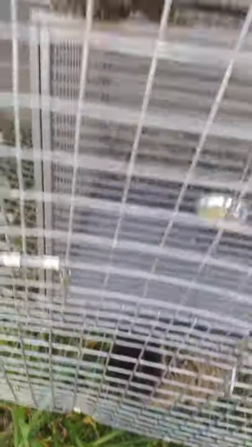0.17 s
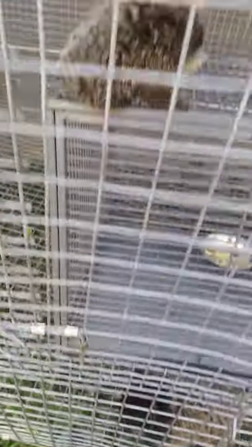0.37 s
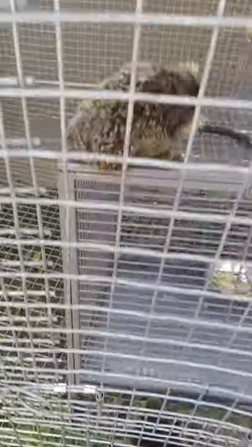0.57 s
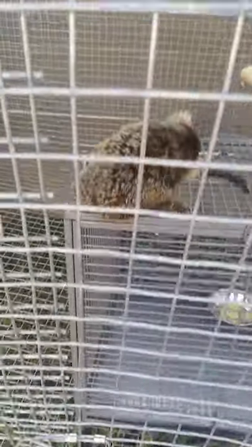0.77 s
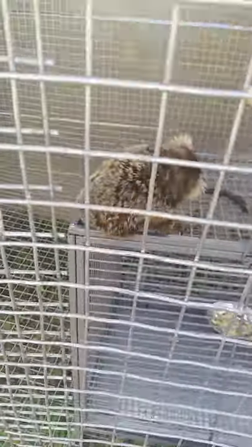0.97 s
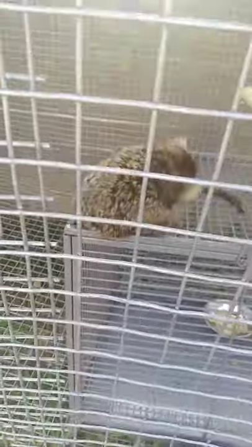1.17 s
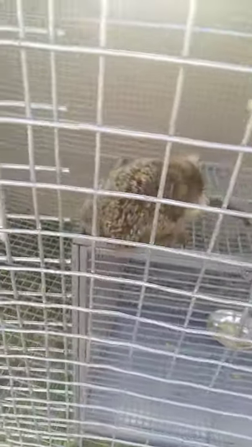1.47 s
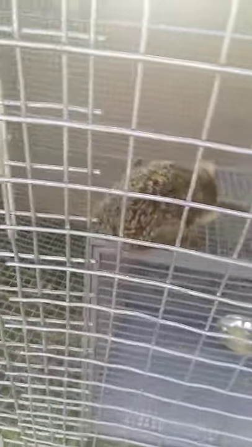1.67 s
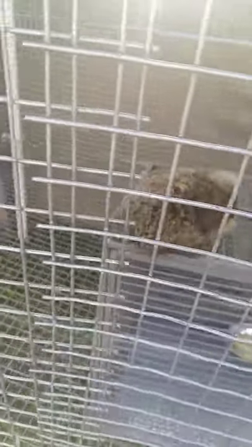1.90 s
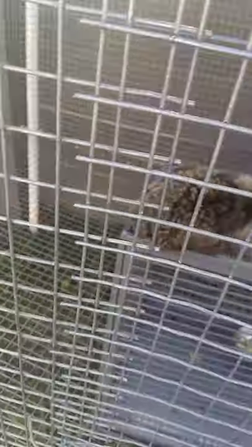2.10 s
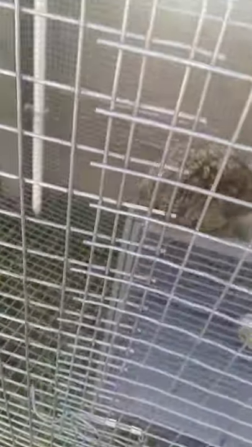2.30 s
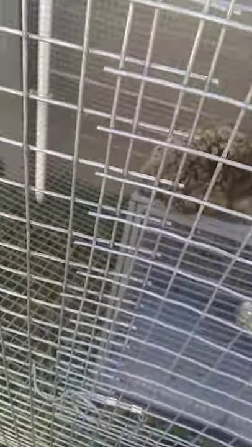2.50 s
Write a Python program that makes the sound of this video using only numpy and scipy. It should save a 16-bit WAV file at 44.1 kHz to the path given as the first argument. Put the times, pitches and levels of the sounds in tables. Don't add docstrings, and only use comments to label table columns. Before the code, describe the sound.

One harsh, raspy bark from a small caged animal comes near the end, after wind rumble and thumps, faint distant twitters, hollow drips and light ticks on wire, outdoors on a handheld microphone.

```python
import sys
import numpy as np
from scipy import signal
from scipy.io import wavfile
from scipy.ndimage import uniform_filter1d

SR = 44100
rng = np.random.default_rng(int(sys.argv[2]) if len(sys.argv) > 2 else 0)


def materialize(psi):
    bounded = np.clip(np.atleast_2d(psi).T, -1, 1)
    quanta = np.round(bounded * 32767).astype(np.int16)
    wavfile.write(sys.argv[1], SR, quanta)


def volts_from_decibels(level):
    exponent = np.asarray(level, float) / 20
    return 10 ** exponent


N = 116865


def evened(x):
    return x / np.sqrt(np.mean(x ** 2) + 1e-20)


def add(mix, start_s, sound):
    part = mix[max(round(start_s * SR), 0):][:len(sound)]
    part += sound[:len(part)]


def curve(t, points):
    return np.interp(t, *np.transpose(points))


def resonate(x, hz, width):
    turn = np.exp(2j * np.pi * np.cumsum(hz * np.ones(len(x))) / SR)
    r = np.exp(-np.pi * width / SR)
    return 2 * (turn * signal.lfilter([(1 - r) ** 2], [1, -2 * r, r * r], x / turn)).real


def breeze(shape, db, patchy_db, gust_db):
    frames, hz = N // 512 + 5, np.fft.rfftfreq(2048, 1 / SR)
    a, b, patches = rng.standard_normal((frames, 1025, 3)).T
    patches = uniform_filter1d(patches, size=8, axis=0)
    patches = evened(uniform_filter1d(patches, size=5, axis=1))
    gusts = evened(uniform_filter1d(rng.standard_normal(frames), size=4))
    f, level = np.transpose(shape)
    colour = np.interp(np.log(hz + 1), np.log(f + 1), level, left=-60, right=-60)
    z = (a + 1j * b) * volts_from_decibels(colour[:, None] + patchy_db * patches + gust_db * gusts)
    noise = signal.istft(z, nperseg=2048, noverlap=1536)[1][:N]
    return volts_from_decibels(db) * evened(noise)


# pitch in Hz, level in dB per Hz.
AIR_COLOUR = [(210, -28), (350, -6.5), (514, -3.5), (843, 0.5), (1160, -6.5), (1820, -13.5), (10100, -20.5),
              (15000, -20.5), (16000, -14)]


def air():
    return breeze(AIR_COLOUR, -72.79, patchy_db=0.36, gust_db=1.03)


# pitch in Hz, width of its waver in Hz, level in dB.
HUM_TONES = [(120.03, 11.9, -52.5), (241.8, 4.9, -68.5), (59.6, 12, -57.5)]


def hum():
    t = np.arange(N) / SR
    out = np.zeros(N)
    for hz, width, db in HUM_TONES:
        clean = np.sin(2 * np.pi * (hz * t + rng.random()))
        waver = evened(resonate(rng.standard_normal(N), hz, width))
        out += volts_from_decibels(db) * (1.25 * clean + 0.41 * waver)
    return out


# start in seconds, level in dB, pitch in Hz.
BUFFET_EVENTS = [
    (.835, -48, 115),
    (.96, -40.5, 114.5),
    (1.595, -41, 129),
    (2.292, -41.5, 102),
    (2.298, -55, 265),
    (0.829, -64, 278),
]


def buffets():
    turns = 0.94
    out = np.zeros(N)
    for start_s, db, hz in BUFFET_EVENTS:
        u = np.arange(SR // 10) / SR * hz / turns
        add(out, start_s, volts_from_decibels(db) * u * np.exp(1 - u) * np.sin(2 * np.pi * turns * u))
    return out


# pitch in Hz, level in dB per Hz.
RUMBLE_COLOUR = [(20, -22.5), (40, -13), (56, 0.5), (124, 0.5), (172, -9.5), (255, -15), (285, -31),
                 (370, -34), (400, -49), (550, -68)]
# time in seconds, change in dB.
GUST_CURVE = [(0, 2), (.4, 2.5), (.55, -2.5), (.78, -3), (.9, 0), (1.2, -0.5), (1.42, 1.5), (1.569, -6),
              (1.75, 2), (2.1, 1.5), (2.242, 1), (2.301, 4.5), (2.36, -3.5), (2.47, -3), (2.65, 0)]
# middle in seconds, depth in dB, half width in seconds.
WIND_LULLS = [(.37, -2, 0.023), (.6, -6.5, 0.0083), (0.743, -16, 0.0066), (0.785, -15, 0.0075),
              (0.916, -7, 0.01), (1.056, -4.5, 0.016), (1.331, -10, 0.0066), (1.531, -11, 0.0066),
              (1.569, -9.5, 0.015), (1.733, -6, 0.019), (2.107, -3.5, .01), (2.265, -10, .02),
              (2.553, -25, 0.0059)]


def wind():
    even_s, even_share, gust_hz = 0.068, 0.78, 129.5
    t = np.arange(N) / SR
    rumble = breeze(RUMBLE_COLOUR, -46.5, patchy_db=-0.7, gust_db=1.5) + hum()
    power = uniform_filter1d(rumble ** 2, round(even_s * SR))
    power = uniform_filter1d(power, round(even_s * SR))
    rumble = rumble * (power.mean() / power) ** (even_share / 2)
    low = signal.sosfiltfilt(signal.butter(3, gust_hz, fs=SR, output="sos"), rumble)
    out = low + volts_from_decibels(curve(t, GUST_CURVE)) * (rumble - low)
    lull_db = sum(db * np.exp(-((t - s) / half_s) ** 2) for s, db, half_s in WIND_LULLS)
    return out * volts_from_decibels(lull_db) * np.minimum(t / .006, 1) + buffets()


def yard(x, wet_db):
    t60_s = 0.21
    t = np.arange(SR // 4) / SR
    tail = rng.standard_normal(len(t)) * volts_from_decibels(-60 * t / t60_s) * (t > .008)
    return x + volts_from_decibels(wet_db) * signal.fftconvolve(x, tail / np.linalg.norm(tail))[:N]


# time in seconds, peak level in dB, pitch in Hz, length in seconds.
DRIP_EVENTS = [(0.093, -56, 739, 0.032), (0.116, -57.5, 741, 0.039), (0.15, -56, 832, 0.021),
               (0.212, -61.5, 587, 0.019), (.21, -64, 715, 0.028), (0.428, -55, 674, 0.03),
               (0.449, -50.5, 690, 0.029), (0.527, -60.5, 720, 0.019), (0.577, -55, 693, 0.027),
               (0.612, -60, 700, 0.019), (0.792, -47.5, 764, 0.019), (0.835, -69, 695, 0.037),
               (0.912, -58, 875, 0.017), (1.078, -55.5, 647, 0.061), (1.129, -65, 597, 0.028),
               (1.2, -55, 775, 0.019), (1.541, -55.5, 868, 0.017), (1.726, -62.5, 803, 0.023),
               (1.754, -54.5, 870, 0.017), (1.863, -63.5, 627, 0.038), (1.961, -60, 912, 0.02),
               (2.005, -70, 797, 0.018), (2.082, -61.5, 877, 0.024), (2.13, -51, 906, 0.02),
               (2.562, -63.5, 969, 0.041)]


def drips():
    level_db, rise = -3.5, 0.091
    out = np.zeros(N)
    for s, db, hz, length_s in DRIP_EVENTS:
        u = np.arange(0, 1, 1 / (length_s * SR))
        tone = np.sin(2 * np.pi * hz * length_s * (u + rise * (u * u - u)))
        add(out, s - .006, volts_from_decibels(db + level_db) * np.sin(np.pi * u) ** 2.27 * tone)
    return out


def strand(length_s, hz, width, db, clean):
    u = np.arange(0, 1, 1 / (length_s * SR))
    fuzz = evened(resonate(rng.standard_normal(SR // 2), hz, width))[-len(u):]
    tone = clean * np.sqrt(2) * np.sin(2 * np.pi * hz * length_s * u) + (1 - clean) * fuzz
    swell = np.clip(np.minimum(u / .3, (1 - u) / .65), 0, 1)
    return volts_from_decibels(db) * np.sin(np.pi / 2 * swell) * tone


# start in seconds, length in seconds, pitch in Hz, level in dB.
SQUEAK_EVENTS = [(0.001, 0.024, 5760, -76), (0.272, 0.0099, 12200, -71), (0.344, 0.019, 2670, -72),
                 (0.363, 0.024, 2670, -69), (0.489, 0.086, 1301, -73.5), (1.238, .014, 4130, -75),
                 (1.51, 0.011, 4070, -71), (1.594, 0.1, 7800, -70.5), (1.704, 0.048, 7750, -82),
                 (1.76, 0.036, 4390, -75), (1.809, 0.019, 7230, -73), (2.172, 0.014, 3090, -77),
                 (2.328, 0.02, 4650, -75), (2.508, 0.09, 3610, -72), (2.57, 0.016, 4680, -72),
                 (2.465, .008, 4700, -57.5), (1.026, 0.013, 4680, -66)]


def squeaks():
    out = np.zeros(N)
    for start_s, length_s, hz, db in SQUEAK_EVENTS:
        add(out, start_s, strand(length_s, hz, 60, db, clean=0.69))
    return out


# start in seconds, length in seconds, pitch in Hz,
# width of its waver in Hz, level in dB.
TWITTER_STRANDS = [(.365, 0.22, 7060, 200, -69), (.47, .26, 7020, 200, -72), (.41, .2, 6330, 170, -70),
                   (.53, .21, 6280, 220, -72), (.43, .1, 8140, 151, -73), (.46, 0.13, 6620, 260, -73),
                   (.44, .28, 7000, 900, -74), (.46, 0.14, 10550, 250, -82), (.47, 0.12, 7900, 250, -77),
                   (.46, .13, 7500, 150, -76), (.56, 0.15, 7450, 90, -76), (.745, .05, 6680, 90, -83),
                   (.55, 0.062, 9100, 250, -84), (.925, 0.02, 6600, 300, -76),
                   (.928, 0.04, 9000, 250, -75.5), (.928, .014, 5800, 200, -78),
                   (.93, .012, 3680, 150, -76), (.927, 0.035, 8200, 900, -75), (.97, 0.034, 7470, 400, -79),
                   (1.415, 0.15, 7200, 219, -78), (1.435, .11, 6520, 60, -75.5),
                   (1.47, 0.027, 8100, 60, -84), (1.472, 0.12, 7500, 60, -80),
                   (1.56, 0.046, 7260, 400, -77.5), (2.34, .08, 3740, 70, -69),
                   (2.466, .032, 7800, 250, -75)]


def twitter():
    out = np.zeros(N)
    for start_s, length_s, hz, width, db in TWITTER_STRANDS:
        add(out, start_s, strand(length_s, hz, width, db, clean=0.27))
    return out


# start in seconds, level in dB, time to fade by 60 dB in seconds.
TICK_EVENTS = [
    (0.474, -58, 0.22),
    (1.009, -61, 0.26),
    (1.558, -68.5, 0.17),
]
# pitch in Hz, width in Hz, level in dB.
WIRE_PANELS = [
    [(2870, 120, -7), (3170, 170, 0), (3376, 150, 2.5), (3625, 90, 3), (3950, 110, -0.5), (4740, 88, -14.5),
     (5320, 110, -5), (5670, 160, -4)],
    [(2890, 200, 0.5), (3547, 120, 2), (3720, 240, 0.5), (3810, 180, -0.5), (4200, 100, -8),
     (4700, 110, -3.5)],
    [(3000, 150, -18), (3600, 120, -5), (3886, 81, -1), (4060, 150, -2)],
]


def ticks():
    crack_db, crack_s = 7, .0045
    t = np.arange(SR // 3) / SR
    out = np.zeros(N)
    knock = volts_from_decibels(crack_db) * (t / crack_s * np.exp(1 - t / crack_s)) ** 2
    for (start_s, db, t60_s), panel in zip(TICK_EVENTS, WIRE_PANELS):
        rattle = rng.standard_normal(len(t))
        swell = np.minimum(t / crack_s / 4, 1) * volts_from_decibels(-60 * t / t60_s)
        ring = np.zeros(len(t))
        for hz, width, tone_db in panel:
            tail = swell * evened(resonate(rattle, hz, width))
            ring += volts_from_decibels(tone_db) * (tail + knock * np.sin(2 * np.pi * hz * (t - crack_s)))
        add(out, start_s, volts_from_decibels(db) * ring / np.sqrt(np.mean(ring[:600] ** 2)))
    return out


CALL_S = 2.346


def folds(t, jitter, breath):
    pulse_hz, weak_pulse, flutter_db = 288.8, 0.29, 1.1
    wander = evened(uniform_filter1d(rng.standard_normal(len(t)), size=150))
    turns = np.cumsum(pulse_hz * (1 + jitter * wander)) / SR
    beats = np.diff(np.floor(turns), prepend=0) * (1 - weak_pulse * (np.floor(turns) % 2))
    puffs = (0.45 + np.exp(-(turns % 1) / 0.44)) * rng.standard_normal(len(t))
    catch = evened(uniform_filter1d(rng.standard_normal(len(t)), size=350))
    return volts_from_decibels(flutter_db * catch) * ((1 - breath) * evened(beats) + breath * evened(puffs))


# pitch in Hz, width in Hz, level in dB,
# time in seconds for its ring in the enclosure to fade by 60 dB.
BARK_TONES = [(1164, 45, -16.5, 0.073), (1430, 210, -3.5, 0.084), (1740, 39, -13.5, 0.23),
              (2067, 110, -2.5, 0.28), (2304, 190, -2, 0.23), (2500, 220, 3, 0.27), (2927, 300, -4.5, 0.21),
              (3140, 220, -13.5, 0.53), (5080, 320, -11.5, 0.25), (6600, 280, -17.5, 0.072),
              (6980, 250, -20, 0.4), (7760, 490, -7.5, 0.037), (8460, 430, -9, 0.041)]
# time in seconds, level in dB.
BARK_LEVEL = [
    (2.35, -4),
    (2.363, 1.5),
    (2.38, 0.5),
    (2.395, -3),
    (2.403, 6.5),
    (2.417, -5.5),
    (2.429, 2),
    (2.445, 2),
    (2.5, -4),
]


def bark():
    rise_s, hold_s, level_db, t60_s = 0.0077, 0.019, -48.5, 0.063
    t = np.arange(SR // 3) / SR
    out = np.zeros(N)
    drive = folds(t, jitter=.045, breath=.45) * np.minimum(t / rise_s, 1)
    late = np.maximum(t - hold_s, 0)
    voice = np.zeros(len(t))
    for k, (hz, width, db, ring_t60_s) in enumerate(BARK_TONES):
        fade = 0.21 * volts_from_decibels(-60 * late / t60_s) + 1.1 * volts_from_decibels(-60 * late / ring_t60_s)
        voice += (-1) ** k * volts_from_decibels(db) * fade * resonate(drive, hz, width) / np.sqrt(width)
    effort = volts_from_decibels(level_db + curve(t + CALL_S, BARK_LEVEL))
    add(out, CALL_S, effort * voice / np.sqrt(np.mean(voice[:1500] ** 2)))
    return out


# pitch in Hz, width in Hz, level in dB.
RASP_TONES = [(4260, 220, -7), (4680, 210, 2.5), (5070, 350, -2), (5520, 290, -8.5), (2096, 190, -2),
              (2535, 130, -1), (7750, 1100, -13)]
# time in seconds, effort in dB.
RASP_EFFORT = [
    (2.355, -69),
    (2.38, -64.5),
    (2.403, -61.5),
    (2.415, -63),
    (2.432, -57.5),
    (2.46, -67.5),
    (2.5, -70.5),
    (2.54, -81),
]


def rasp():
    t = np.arange(SR // 3) / SR
    out = np.zeros(N)
    drive = folds(t, jitter=.15, breath=.68)
    voice = np.zeros(len(t))
    for k, (hz, width, db) in enumerate(RASP_TONES):
        voice += (-1) ** k * volts_from_decibels(db) * resonate(drive, hz, width) / np.sqrt(width)
    when, effort_db = np.transpose(RASP_EFFORT)
    effort = volts_from_decibels(np.interp(t + CALL_S, when, effort_db, left=-120, right=-120))
    add(out, CALL_S, effort * evened(voice))
    return out


def scene():
    background = wind() + air()
    animals = squeaks() + twitter() + bark() + rasp()
    mix = background + yard(drips(), wet_db=-5) + ticks() + yard(animals, wet_db=-9)
    return mix[None]


def top_cut(x):
    return signal.sosfilt(signal.butter(12, 16130, fs=SR, output="sos"), x)


def record(dry):
    x = signal.sosfilt(signal.butter(3, 44, "high", fs=SR, output="sos"), dry)
    treble_limit = signal.firwin(511, 15800, window=("kaiser", 9), fs=SR)
    x = signal.oaconvolve(x, treble_limit[None], "same")
    x = x * np.minimum(np.arange(N)[::-1] / 130, 1)
    return top_cut(x)


dry = scene()
out = record(dry)
materialize(out)
```